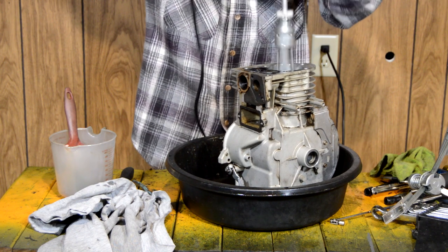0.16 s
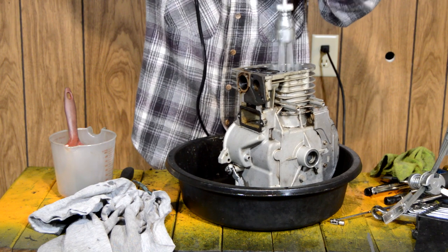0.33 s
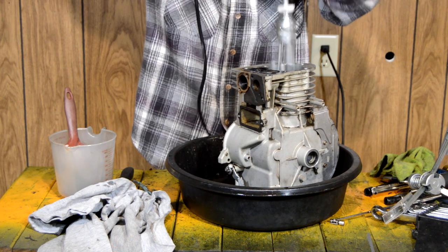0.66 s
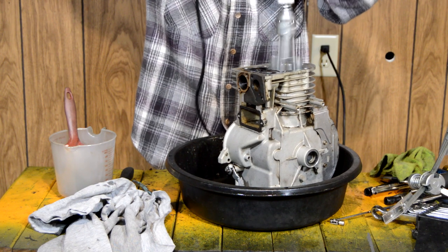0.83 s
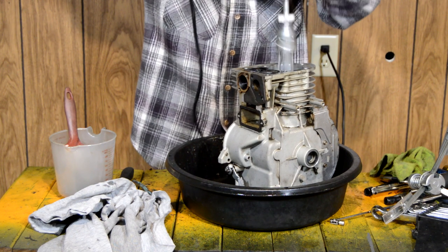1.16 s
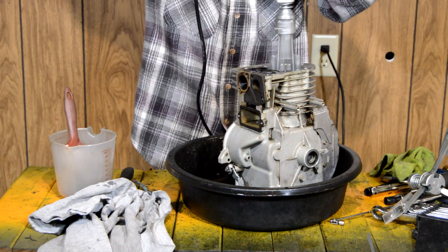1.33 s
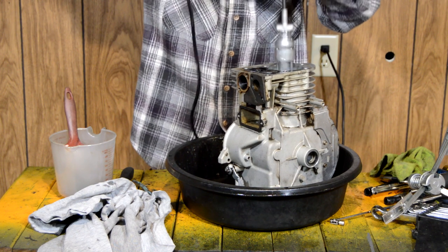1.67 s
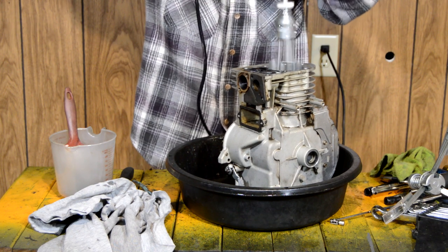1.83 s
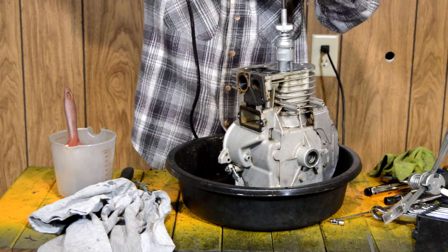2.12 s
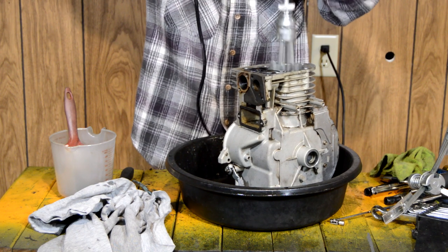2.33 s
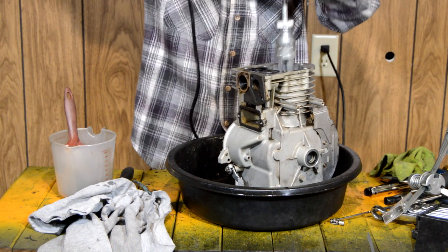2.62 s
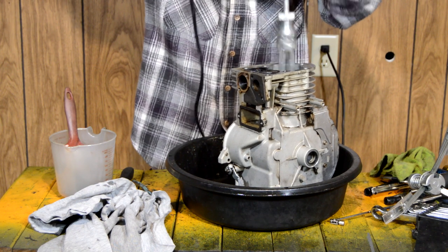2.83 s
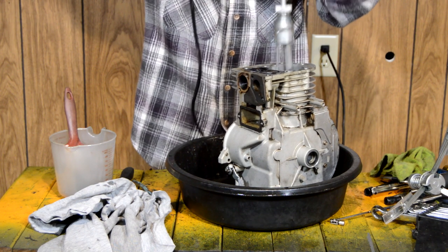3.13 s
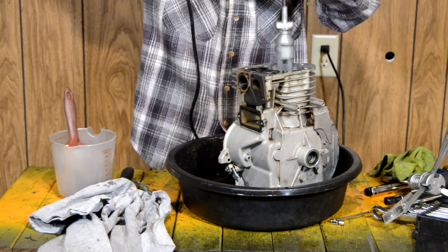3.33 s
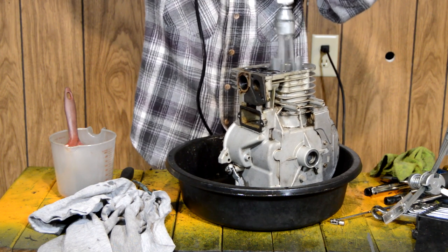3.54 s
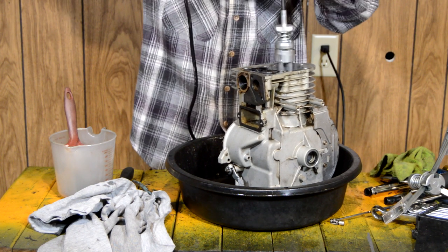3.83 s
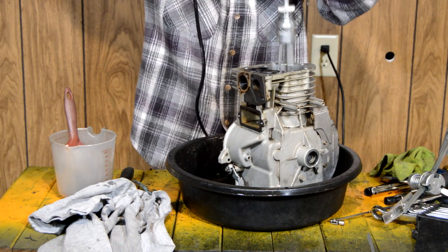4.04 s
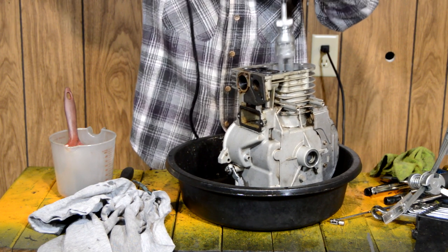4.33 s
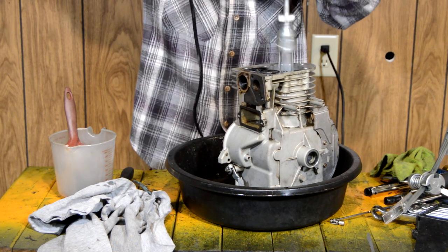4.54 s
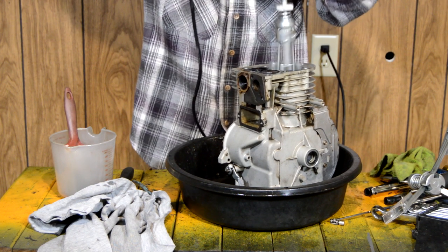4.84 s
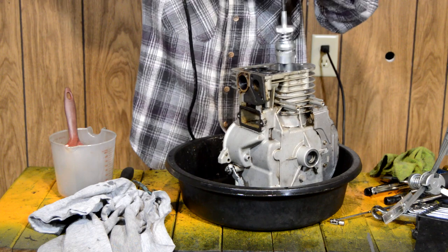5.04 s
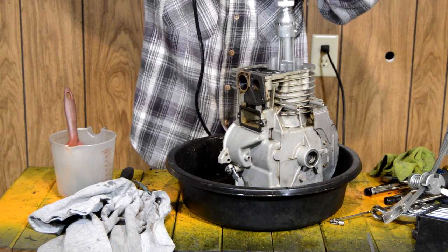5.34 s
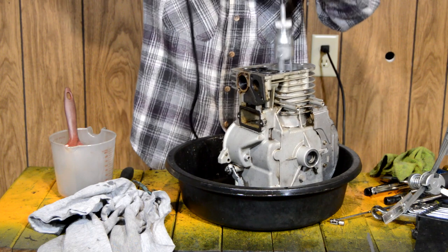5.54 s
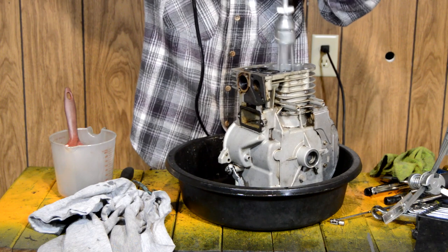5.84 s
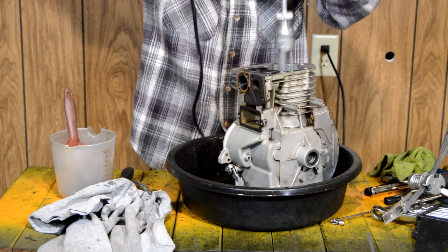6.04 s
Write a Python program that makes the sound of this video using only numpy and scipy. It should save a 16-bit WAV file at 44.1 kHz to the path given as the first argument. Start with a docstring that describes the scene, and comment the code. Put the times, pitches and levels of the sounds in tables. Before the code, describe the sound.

A corded drill whirs steadily while abrasive stones scrape up and down inside a metal engine cylinder, with bright ringing hiss and occasional grit ticks.

```python
"""Honing a small engine's bore

A small workshop, one close microphone: a corded drill spins a three-stone hone up and down in the bore of an
engine on the bench. Noise and grit blows ring the block's resonances, and single coarse grains tick.
The drill adds rattling gears, growling teeth, a mains-rate buzz and hum; the bench rumbles under small blows.
Only the sounds from the bore carry the workshop's reflections; both channels are the same."""
import sys
import numpy as np
from scipy import signal
from scipy.fft import rfft, irfft, next_fast_len
from scipy.io import wavfile
from scipy.ndimage import uniform_filter1d

SR = 44100
rng = np.random.default_rng(int(sys.argv[2]) if len(sys.argv) > 2 else 0)


def transcribe(u):
    """Save the signal u as a 16-bit wav file named by the first command-line argument.

    u: samples, shape (n,) or (channels, n), limited to [-1, 1]; the rate is SR.
    q: integer samples, one column per channel.
    """
    v = np.clip(np.atleast_2d(u).T, -1, 1)
    q = np.round(v * 32767).astype(np.int16)
    wavfile.write(sys.argv[1], SR, q)


N = 272582
TIME = np.arange(N) / SR  # s
MAINS_HZ = 60
BAND_LIMIT_HZ = 15770

# the workshop's decay: [f/Hz, t60/s]
ROOM_DECAY = [(200, 0.32), (2000, 0.28), (14000, 0.079)]
# bench top, resonances: [f/Hz, width/Hz, relative level/dB]
BENCH_MODES = [(51, 5, -1.5), (84, 15, 0.0), (103, 18, -2.6), (151, 11, -3.1), (200, 11, -2.2),
               (255, 27, -8.8), (350, 25, -7.5)]
# bench top, dense modes beneath the resonances: [f/Hz, relative level/dB]
BENCH_BODY = [(12, -50), (25, -16), (40, -24), (50, -10), (130, -10), (450, -9.5), (800, -21.5),
              (1600, -66.5)]
# how hard the engine shakes the bench: [t/s, relative level/dB]
BENCH_SHAKE = [(0.0, -28.5), (0.65, -28), (0.88, -29.5), (1.12, -27.5), (1.7, -29.5), (2.3, -30),
               (2.85, -27.5), (3.1, -29), (3.5, -28), (4.02, -30), (4.27, -29), (4.45, -29.5),
               (4.73, -29.5), (5.15, -31.5), (5.4, -29), (5.8, -31), (6.18, -30)]
# drill's gear case, resonances: [f/Hz, width/Hz, relative level/dB]
GEARCASE_MODES = [(667, 120, -1), (802, 61, -5.5), (881, 70, -5.0), (1094, 38, -8.5)]
# gear case, dense modes beneath the resonances: [f/Hz, relative level/dB]
GEARCASE_BODY = [(125, -31), (250, -28.5), (500, -13), (900, -12), (1500, -19.5), (3000, -55)]
# the motor's magnetic hum: [t/s, level before wavering/dB]
MOTOR_HUM = [(0, -34), (0.6, -33.5), (2, -35), (2.7, -30.5), (3.4, -32), (4.1, -35.5), (4.8, -34),
             (5.4, -34), (6.18, -39)]
# engine block, resonances: [f/Hz, width/Hz, relative level/dB]
BLOCK_MODES = [(1644, 85, -14.7), (2208, 30, -6.7), (2456, 11, -3.3), (2523, 12, -7.5), (2721, 16, -11.2),
               (3055, 156, -16.8), (3449, 18, -11.3), (3474, 186, -14.6), (4457, 18, -12.6),
               (4906, 15, -3.6), (4987, 359, -13.6), (5555, 50, -3.6), (5651, 31, -7.5), (5849, 98, -9.0),
               (6055, 67, 0.0), (6286, 307, -5.9), (6515, 39, -5.6), (6657, 66, -7.8), (6958, 196, -11.0),
               (7640, 203, -8.6), (7829, 45, -9.1), (8076, 24, -8.4), (8277, 51, -10.2), (9289, 68, -12.5),
               (12076, 287, -17.0), (13648, 99, -19.3), (13888, 100, -15.3), (15052, 46, -18.9),
               (15591, 197, -19.8)]
# engine block, dense modes beneath the resonances: [f/Hz, relative level/dB]
BLOCK_BODY = [(300, -50), (600, -33.3), (1200, -18.9), (2300, -12.4), (2800, -16.5), (4100, -18.6),
              (4900, -12.8), (6200, -8.9), (7800, -10.4), (9500, -14.9), (10800, -19.8), (13000, -20.8),
              (15700, -19.5)]
# coarse grains that catch in the bore: [t/s, relative strength/dB]
GRAIN_CATCHES = [(0.4298, -2), (1.0417, 0), (1.6658, 1), (1.6933, -4), (2.2195, -2), (3.6394, 0),
                 (5.0668, 1), (5.908, 3)]
# each push or pull of the hone, at its fastest: [t/s, relative scrape level/dB, relative gear load/dB]
HONE_SWEEPS = [(0.07, -15.5, -24.5), (0.33, -17.0, -26), (0.64, -15.5, -25.2), (0.75, -16.5, -26.5),
               (1.11, -16.5, -24.5), (1.33, -16.5, -25.5), (1.62, -15.1, -25.5), (1.97, -17, -26),
               (2.18, -16, -26.5), (2.56, -17, -25.6), (2.75, -16.6, -28), (3.05, -16.0, -26),
               (3.34, -16.4, -26.5), (3.66, -16.1, -26), (3.85, -15, -28), (4.31, -16.5, -27),
               (4.42, -15.5, -24.5), (4.83, -15, -28), (5.06, -15.5, -28), (5.38, -16.5, -28),
               (5.58, -14.5, -25), (6.05, -15, -27), (6.22, -17, -31)]
# swells of the finest grit, about one per up-and-down stroke: [t/s at the height, length/s, relative level/dB]
HISS_SWELLS = [(0.13, 0.3, -27), (0.7, 0.36, -26.7), (1.27, 0.26, -28.7), (1.73, 0.38, -28),
               (2.3, 0.34, -29), (2.96, 0.28, -27), (3.49, 0.37, -29), (3.95, 0.24, -25.5),
               (4.35, 0.37, -30.3), (4.77, 0.37, -27.5), (5.33, 0.43, -30), (5.66, 0.27, -28),
               (5.94, 0.37, -29.4)]
HISS_BETWEEN_DB = -31.5  # relative, on the same scale as the swells

# the hone slows at every turn, the more the longer the turn takes: dB lost per s between sweeps
SCRAPE_EASE, GRIND_EASE, GEAR_EASE = 4.6, 5.3, 5.5
TURN_SHARPNESS = 2.2  # higher = a briefer lull at the turn
SMOOTHING_DB_PER_S = 0.3142  # the coarse grinding fades as the wall gets smoother


def amp(db):
    """Decibels to gain."""
    return 10 ** (np.asarray(db) / 20)


def evened(x):
    """Scales to an rms of one."""
    return x / np.sqrt(np.mean(x ** 2) + 1e-20)


def read(points, hz):
    """Reads a frequency table on a log-frequency axis."""
    f, value = np.transpose(points)
    return np.interp(np.log(hz + 1), np.log(f + 1), value)


def level(curve):
    """A curve of [t/s, level/dB] as a gain, sample by sample."""
    return amp(np.interp(TIME, *np.transpose(curve)))


def split(x, edge_hz):
    """The parts of a sound below and above a frequency."""
    size = next_fast_len(N, True)
    hz = np.fft.rfftfreq(size, 1 / SR)
    low_spectrum = rfft(x, size) / (1 + (hz / edge_hz) ** 16)
    low = irfft(low_spectrum, size)[:N]
    return low, x - low


def flutter(rate_hz):
    """Random wavering of rms one, weaker below 6 Hz and above the given rate."""
    size = next_fast_len(N, True)
    hz = np.fft.rfftfreq(size, 1 / SR)
    shape = hz / np.hypot(hz, 6) / np.hypot(hz, rate_hz)
    shape = shape / (1 + (hz / 400) ** 2)
    return evened(irfft(rfft(rng.standard_normal(size)) * shape, size)[:N])


def impacts(per_s, spread_db):
    """Randomly timed tiny blows of either sign, most small and a few large."""
    size = amp(spread_db * np.minimum(rng.exponential(1, N), 4))
    sign = rng.choice([-1, 1], N)
    strikes = rng.random(N) < per_s / SR
    return evened(size * sign * strikes)


def ring(force, modes, body, shares=1):
    """Plays a force through an object; shares tell how strongly it drives each mode, in power."""
    hz = np.fft.rfftfreq(32768, 1 / SR)
    centre, width, db = np.transpose(modes)
    peaks = amp(db) ** 2 / (1 + 2 * ((hz[:, None] - centre) / width) ** 2) ** 2
    power = amp(read(body, hz)) ** 2 + (peaks * shares).sum(1)
    log_gain = np.log(power) / 2
    circle = np.r_[log_gain, log_gain[-2:0:-1]]
    # minimum phase: every mode rings after the blow
    spectrum = np.exp(np.conj(signal.hilbert(circle)))
    response = np.fft.ifft(spectrum).real[:len(hz)]
    return signal.fftconvolve(force, response)[:N]


def whistle(hz, wander, width_hz, burst_db):
    """A fuzzy tone that swells and fades while its pitch wanders within bounds (wander: log ratio)."""
    drift = np.tanh(evened(uniform_filter1d(flutter(rate_hz=8.08), size=1500)))
    pitch_hz = hz * np.exp(wander * drift)
    turn = np.exp(2j * np.pi * np.cumsum(pitch_hz) / SR)
    # noise through two equal poles: a narrow band, moved up to the pitch
    r = np.exp(-np.pi * width_hz / SR)
    noise = rng.standard_normal(N) + 1j * rng.standard_normal(N)
    fuzz = signal.lfilter([1], [1, -2 * r, r * r], noise)
    bursts = amp(burst_db * np.tanh(flutter(rate_hz=31)))
    return evened((turn * fuzz).real * bursts)


def stroking():
    """Gains of scrape, grinding and gear load: full in mid-sweep, easing off where the hand turns round."""
    s, scrape_db, gear_db = np.transpose(HONE_SWEEPS)
    place = np.interp(TIME, s, np.arange(len(s)))  # whole numbers at the sweeps
    gap_s = np.append(np.diff(s), 0)[place.astype(int)]
    turning = abs(np.sin(np.pi * place)) ** TURN_SHARPNESS * gap_s
    pressure_db = np.interp(TIME, s, scrape_db)
    load_db = np.interp(TIME, s, gear_db)
    scrape = amp(pressure_db - SCRAPE_EASE * turning)
    grind = amp(pressure_db - GRIND_EASE * turning - SMOOTHING_DB_PER_S * TIME)
    gear_load = amp(load_db - GEAR_EASE * turning)
    return scrape, grind, gear_load


def workshop(x, wet_db=-19):
    """Dense reflections from the panelled walls, the treble dying first; wet_db is relative to the direct."""
    hz, t, z = signal.stft(rng.standard_normal(SR // 2), SR, nperseg=256)
    decay = amp(-60 * t / read(ROOM_DECAY, hz)[:, None])
    tail = signal.istft(z * decay, SR)[1]
    tail[:SR // 250] = 0  # nothing comes back in the first 4 ms
    wet = signal.fftconvolve(x, tail / np.linalg.norm(tail))[:N]
    return (x + amp(wet_db) * wet) / np.hypot(1, amp(wet_db))


def bench(level_db=-1.3):
    """The dragging hone jiggles the engine in its plastic pan, and small blows shake the bench top."""
    blows = impacts(per_s=900, spread_db=1.5)
    rumble = evened(ring(blows, BENCH_MODES, BENCH_BODY))
    return amp(level_db) * level(BENCH_SHAKE) * rumble


def drill(growl_db=-9, buzz_db=-11, throb=0.1, kick_cycles=0.025, waver_db=1.2, snatch_db=0.9):
    """Torque kicks at the mains rate buzz the case and make the loose gears' knocking throb."""
    # the load follows the sweeps and snatches as the stones grab
    load = stroking()[-1] * amp(snatch_db * flutter(rate_hz=5.5))
    cycle = MAINS_HZ * TIME
    knocks = impacts(per_s=2500, spread_db=1.5) * (1 + throb * np.cos(2 * np.pi * cycle))
    kicks = np.diff(np.exp(-(cycle % 1) / kick_cycles), prepend=1)
    gears = evened(ring(knocks, GEARCASE_MODES, GEARCASE_BODY))
    buzz = evened(ring(kicks, GEARCASE_MODES, GEARCASE_BODY))
    # the meshing teeth growl at a pitch that wavers
    growl = whistle(hz=657.7, wander=0.0487, width_hz=23.4, burst_db=-0.5)
    # the iron is pulled twice in every mains cycle
    hum = evened(np.sin(2 * np.pi * 2 * cycle))
    hum = level(MOTOR_HUM) * hum * amp(waver_db * flutter(rate_hz=5.8))
    return load * (gears + amp(growl_db) * growl + amp(buzz_db) * buzz) + hum


def catches(peak_db=-5, crush_s=0.0036):
    """A coarse grain is crushed in a few milliseconds and ticks the block; peak_db is the loudest tick's."""
    force = np.zeros(N)
    t = TIME[:SR // 100]
    for s, db in GRAIN_CATCHES:
        burst = rng.standard_normal(len(t)) * np.exp(-t / crush_s)
        force[round(s * SR):][:len(t)] += amp(db) * burst / np.linalg.norm(burst)
    ticks = ring(force, BLOCK_MODES, BLOCK_BODY)
    return amp(peak_db) * ticks / abs(ticks).max()


def swelling():
    """Gain of the fine hiss: bell-shaped swells over a steady bed, added in power."""
    swells = sum(amp(db) ** 2 * np.exp(-(2 * (TIME - s) / length) ** 2) for s, length, db in HISS_SWELLS)
    return np.sqrt(amp(HISS_BETWEEN_DB) ** 2 + swells)


def stone(load, shares, grit=0.4):
    """One sprung stone: smooth rubbing and grit (its share of the power) drive the block under its load."""
    rubbing = np.sqrt(1 - grit) * rng.standard_normal(N)
    grains = np.sqrt(grit) * impacts(per_s=2600, spread_db=2.5)
    return ring((rubbing + grains) * load, BLOCK_MODES, BLOCK_BODY, shares)


def hone(count=3, chatter_db=5.5, ringing_db=0.4, scrape_db=-0.7, grind_db=-6.5, hiss_db=3.5, squeak_db=-14,
         grip_db=0.51, coarse_db=1.06, fine_db=1.0, hiss_flutter_db=1.4):
    """The stones touch different parts of the bore, so each drives the block's modes in other shares."""
    shares = amp(ringing_db) ** 2 * count * rng.dirichlet(np.ones(count), len(BLOCK_MODES)).T
    # as the hone chatters the load passes from stone to stone, and the ringing shimmers
    loads = np.array([amp(chatter_db * flutter(rate_hz=6.7)) for _ in shares])
    loads = loads / np.linalg.norm(loads, axis=0)
    rubbing = sum(stone(load, share) for load, share in zip(loads, shares))
    low, rest = split(rubbing, edge_hz=4900)
    middle, top = split(rest, edge_hz=11000)
    scrape, grind, _ = stroking()
    # a stone that sticks and slips squeaks
    squeak = whistle(hz=6230, wander=.055, width_hz=220, burst_db=-0.5)
    # coarse and fine grit come and go independently in the oil film
    grinding = amp(grind_db + coarse_db * flutter(rate_hz=44)) * grind * evened(low)
    scrape_tone = evened(middle) + amp(squeak_db) * squeak
    scraping = amp(scrape_db + fine_db * flutter(rate_hz=19)) * scrape * scrape_tone
    hissing = amp(hiss_db + hiss_flutter_db * flutter(rate_hz=22)) * swelling() * evened(top)
    # the grip of the whole hone on the wall is uneven
    return amp(grip_db * flutter(rate_hz=5.8)) * (grinding + scraping + hissing)


def scene():
    """All sources meet at one microphone, the same in both channels."""
    mono = workshop(hone() + catches()) + drill() + bench()
    return np.array([mono, mono])


def record(dry):
    """The highest peaks are rounded off below full scale; then the band limit."""
    knee, headroom = .65, .25  # of full scale
    rounded = np.clip(dry, -knee, knee)
    rounded = rounded + headroom * np.tanh((dry - rounded) / headroom)
    lowpass = signal.firwin(1023, BAND_LIMIT_HZ, window=("kaiser", 9), fs=SR)
    return signal.oaconvolve(rounded, lowpass[None], "same", axes=1)


dry = scene()
out = record(dry)
transcribe(out)
```